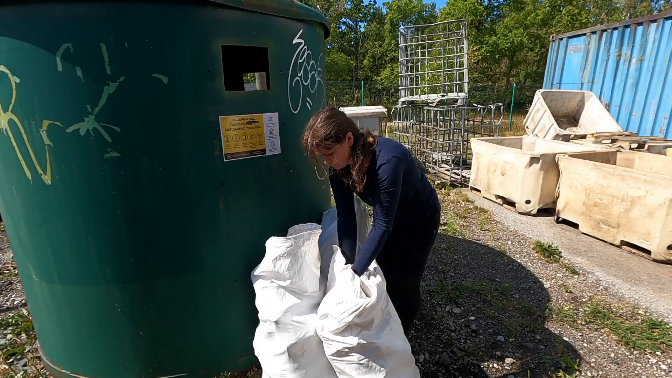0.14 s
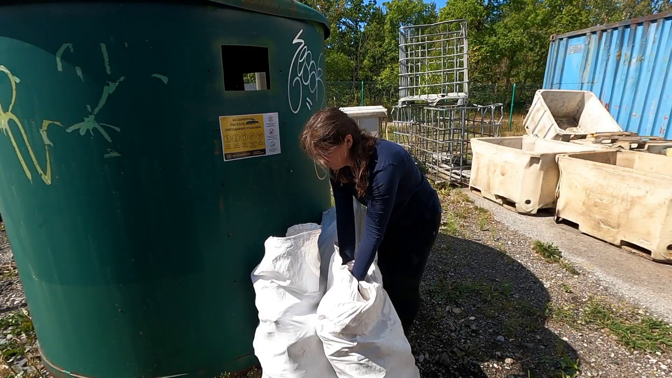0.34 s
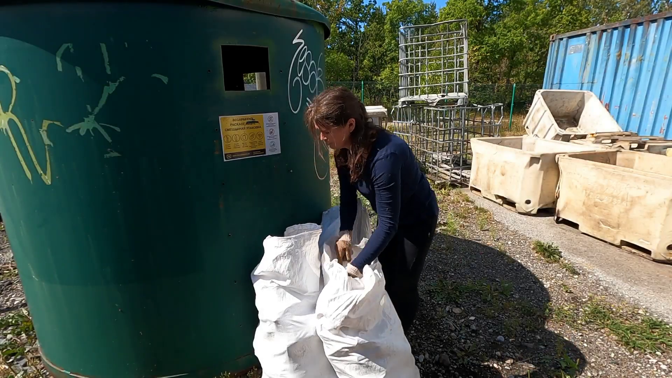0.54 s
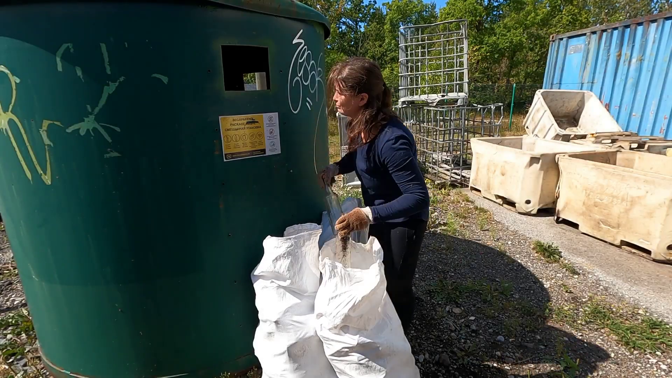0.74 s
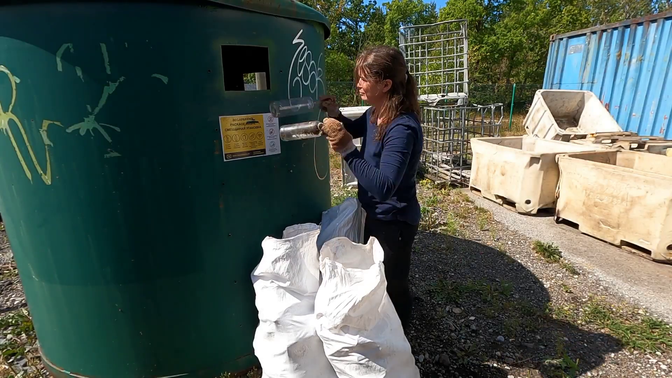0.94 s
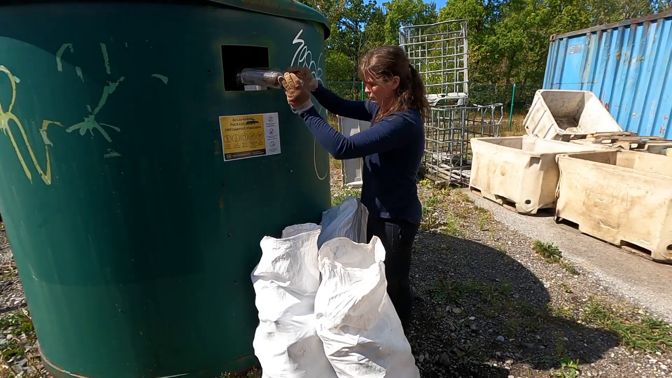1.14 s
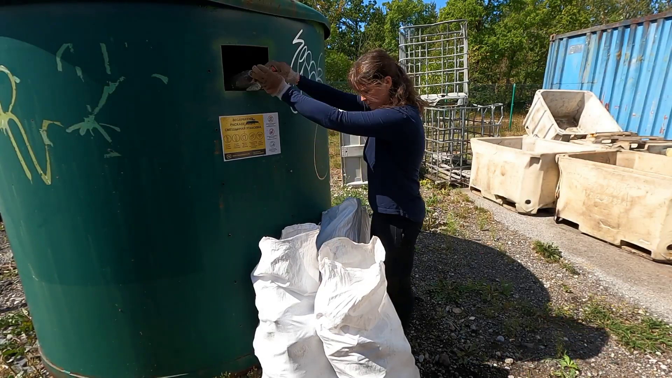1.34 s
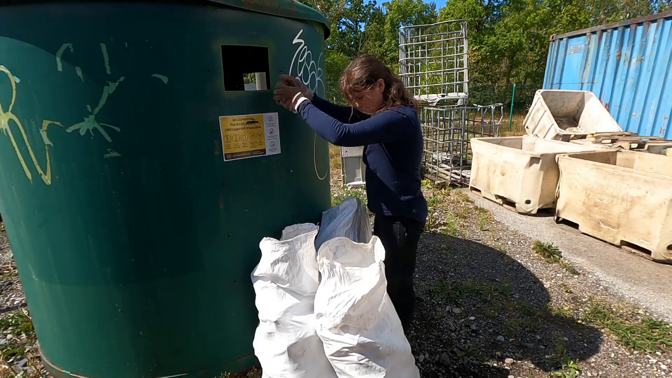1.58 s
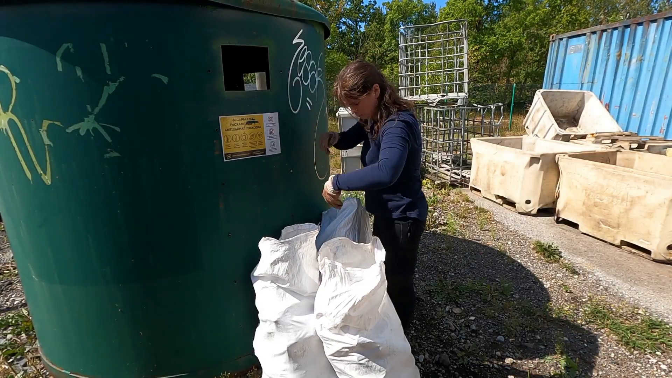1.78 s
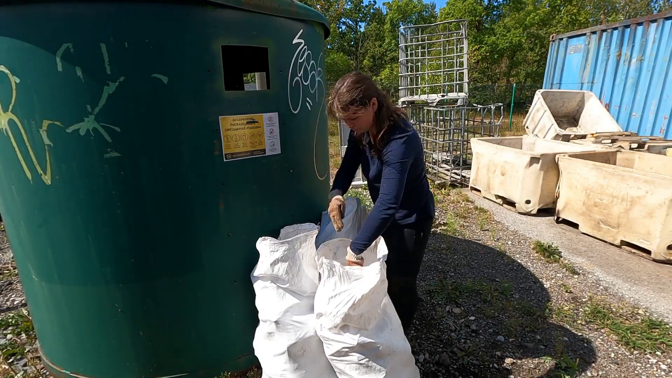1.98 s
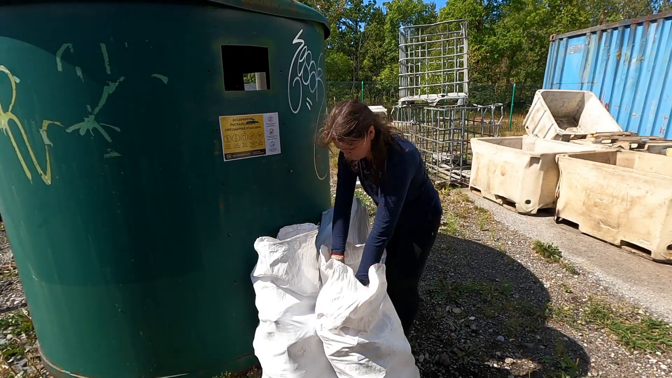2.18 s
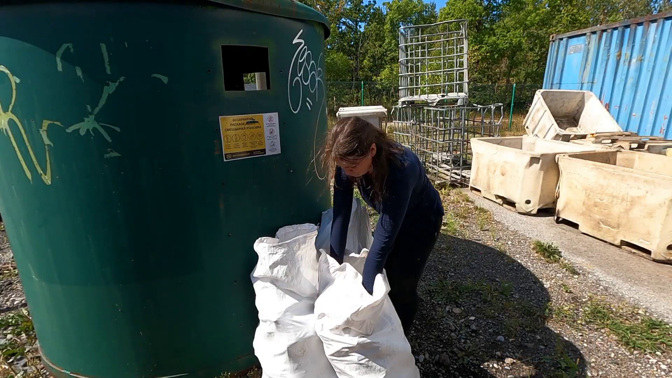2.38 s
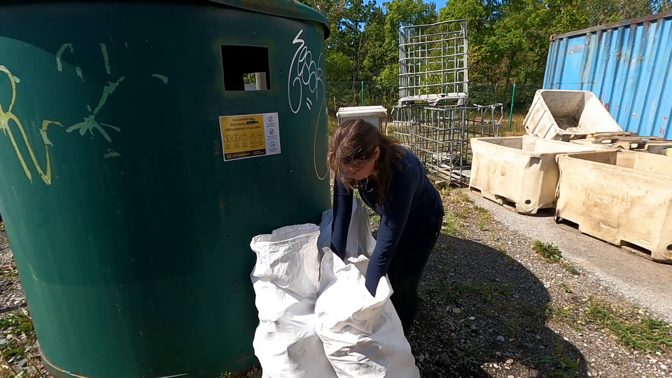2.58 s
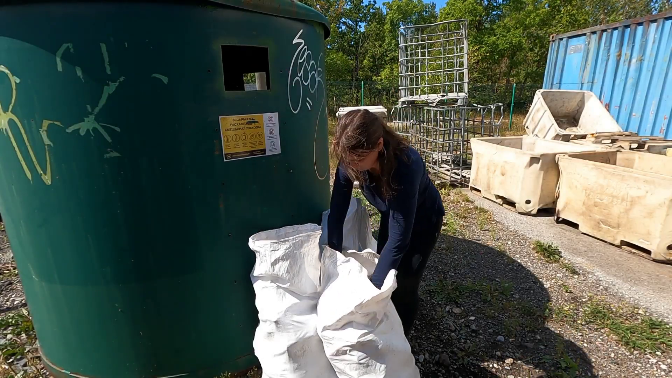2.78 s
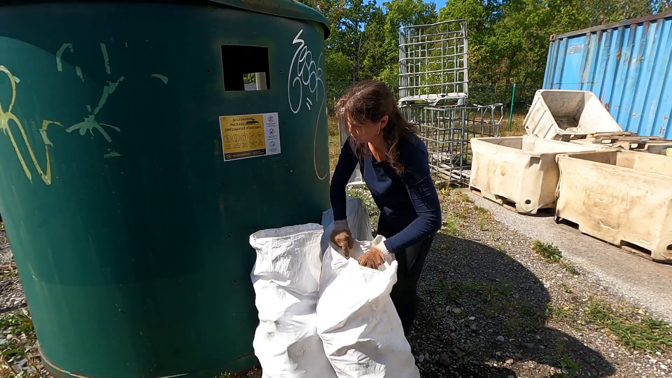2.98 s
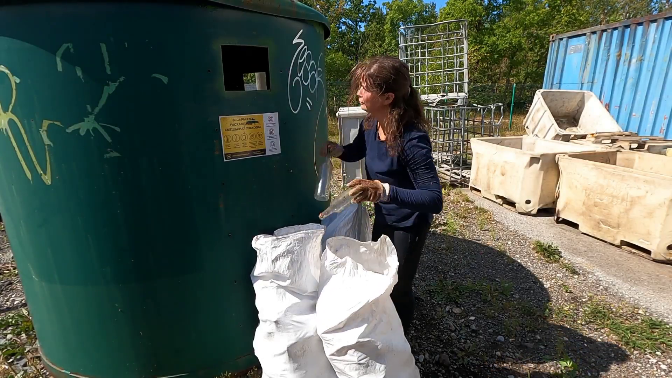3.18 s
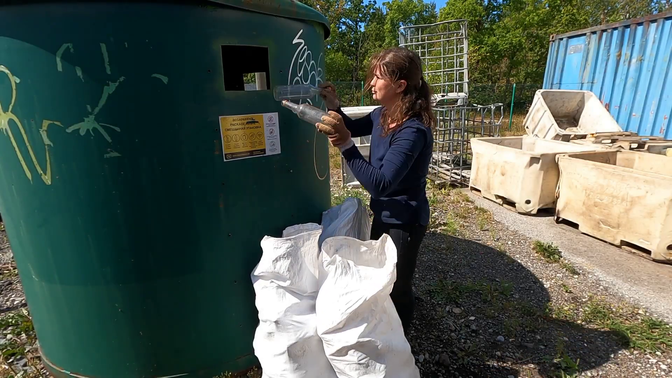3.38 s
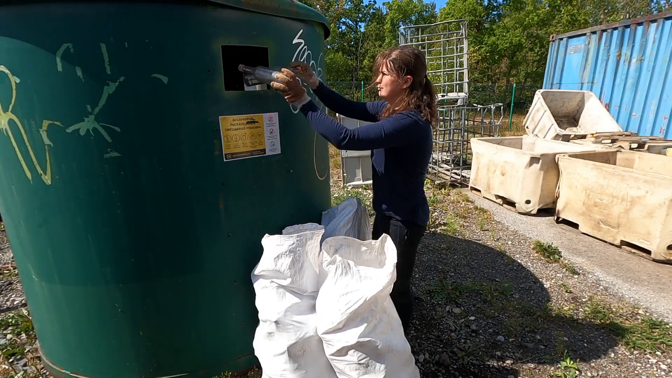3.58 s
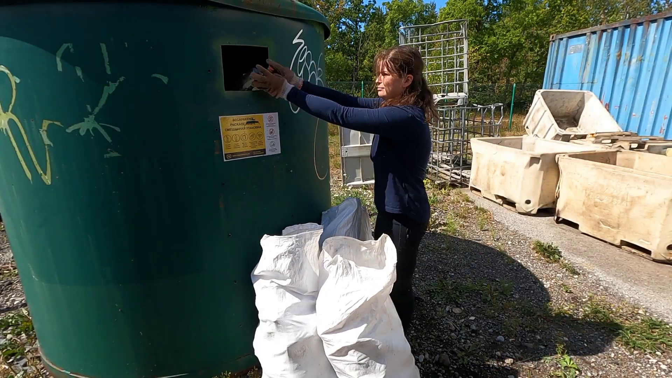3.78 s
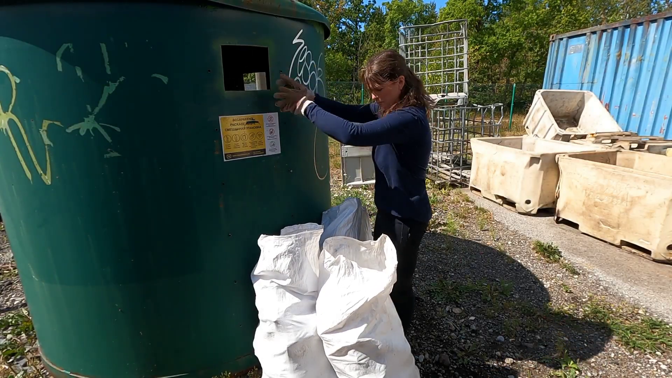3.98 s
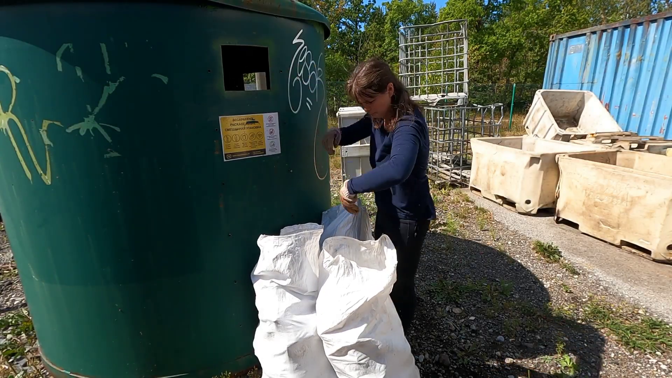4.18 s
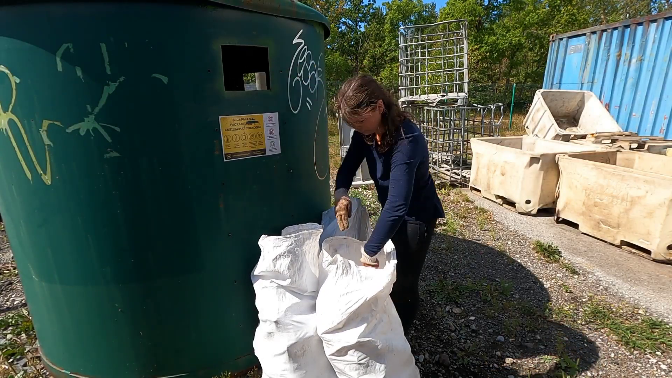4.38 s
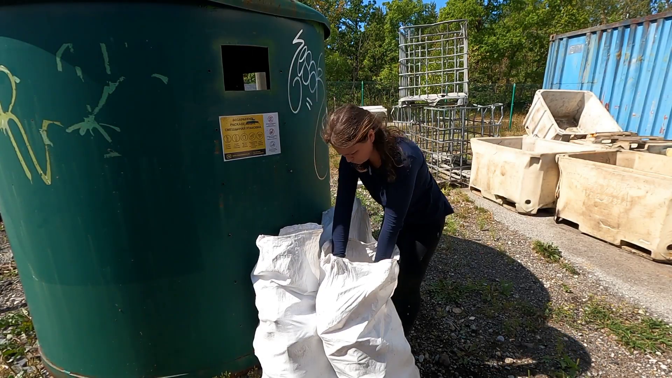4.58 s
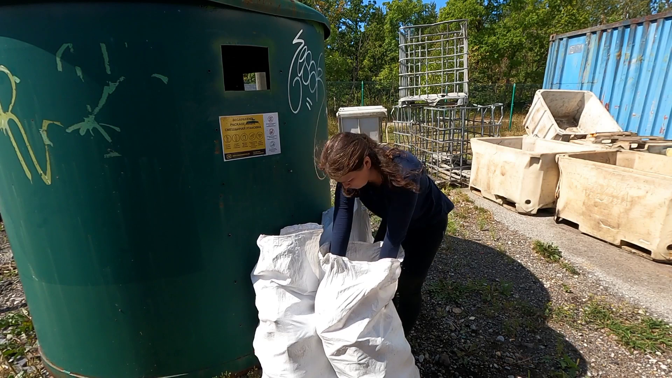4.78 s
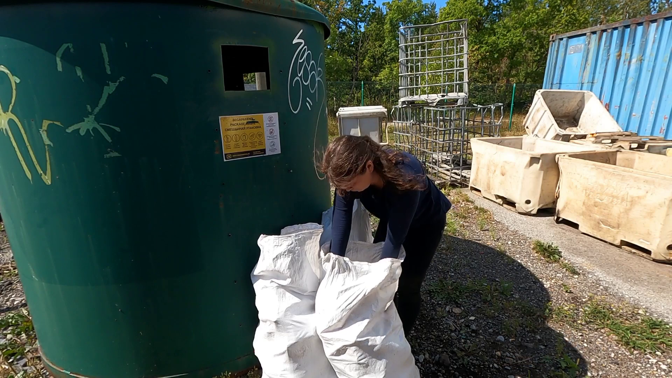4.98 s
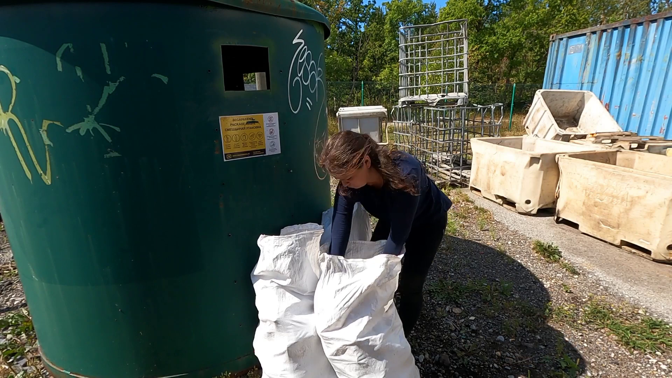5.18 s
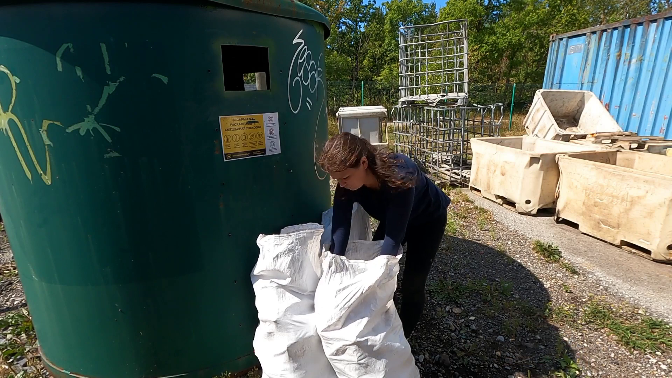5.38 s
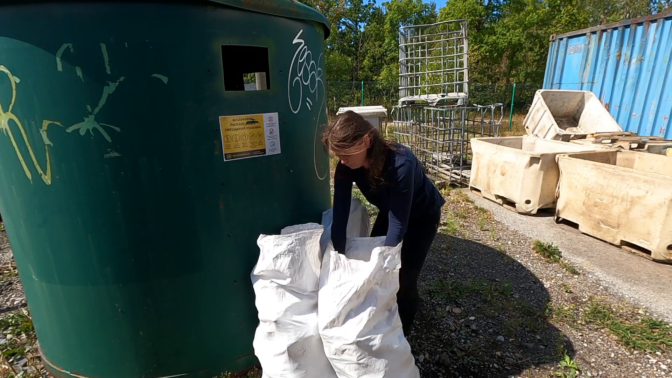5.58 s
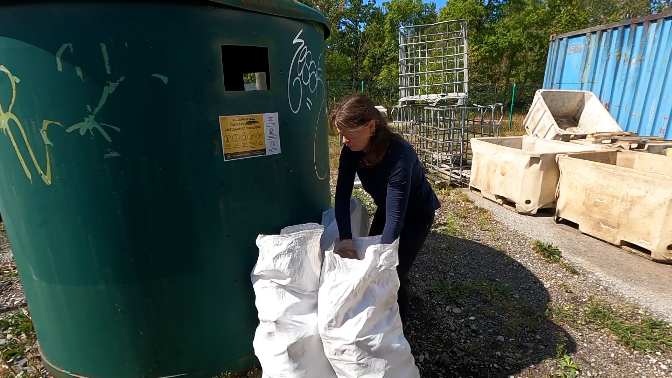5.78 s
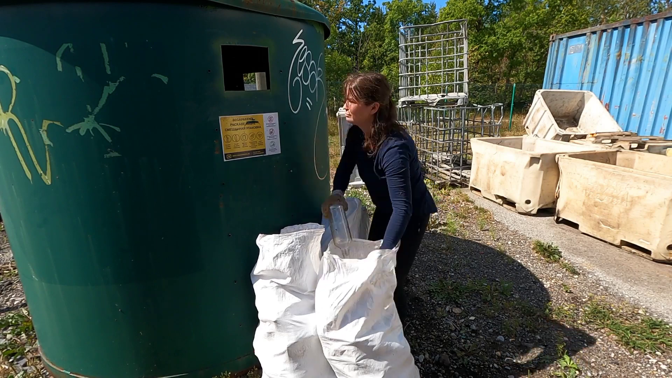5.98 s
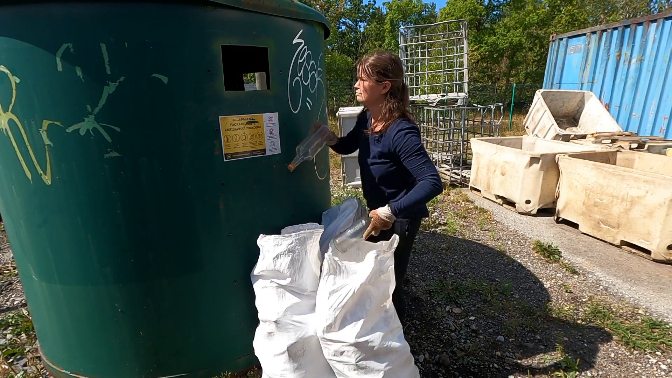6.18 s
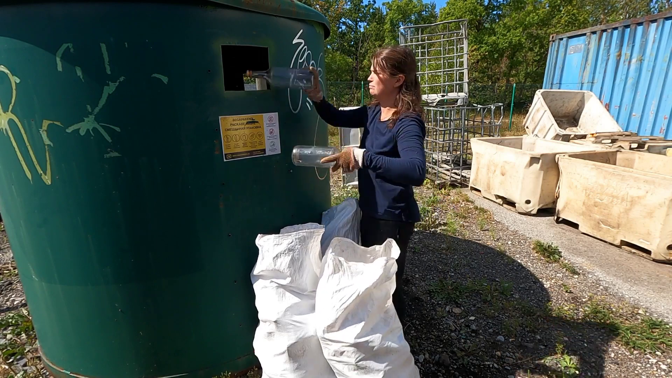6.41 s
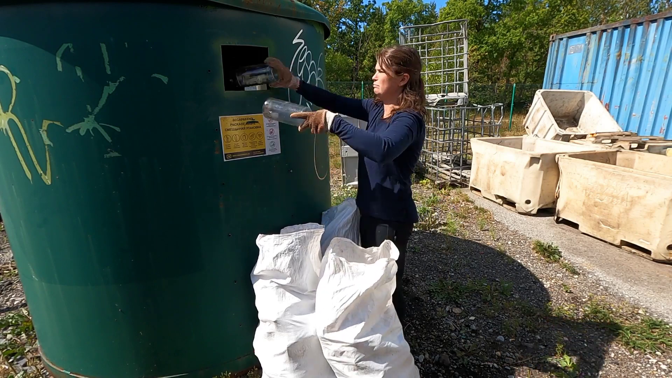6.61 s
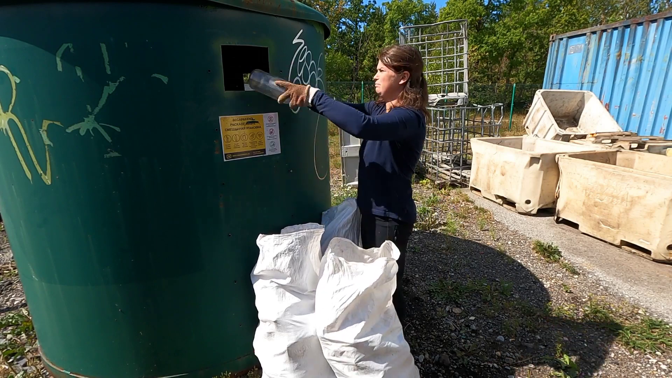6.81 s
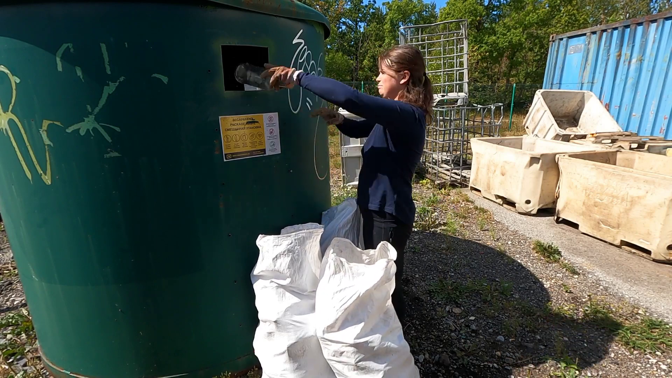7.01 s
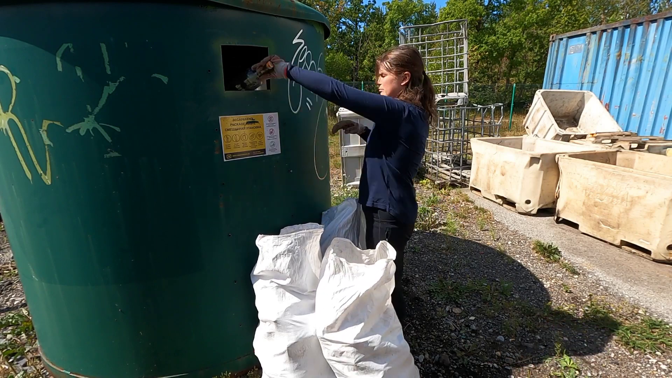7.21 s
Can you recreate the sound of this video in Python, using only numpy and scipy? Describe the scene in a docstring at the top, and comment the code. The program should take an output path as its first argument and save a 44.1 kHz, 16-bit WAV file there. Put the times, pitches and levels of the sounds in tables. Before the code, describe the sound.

Crinkly sack rustle and small dull clinks, a pause, hollow booming knocks at a bin opening, then a hard, bright smash inside with shards sliding and settling. The cycle repeats with a clear clink before another crash, then busier rummaging, and lastly a rim knock and ringing landing. Quiet open yard, light gusts on a nearby microphone, enclosed echo only on the glass in the bin.

```python
"""Glass bottles and jars, modelled as sums of decaying modes, clink in a sack and are pushed into a bottle bank.
They knock on the rim, where filtered noise and standing waves make the bin boom, then smash on the heap inside:
cracks, thuds and random streams of tinkling shards, sent through a tail of dense echoes.
The woven sack rustles as clumps of tiny snaps; gusts and the hush of the yard are shaped noise."""
import sys
import numpy as np
from scipy import signal
from scipy.io import wavfile
from scipy.ndimage import uniform_filter1d

SR = 44100
rng = np.random.default_rng(int(sys.argv[2]) if len(sys.argv) > 2 else 0)


def materialize(psi):
    """Save the field psi as 16-bit PCM at rate SR to the path in sys.argv[1].

    A 1-D psi becomes a single channel; in a 2-D psi each row is a channel.
    """
    bounded = np.clip(np.atleast_2d(psi).T, -1, 1)
    quanta = np.round(bounded * 32767).astype(np.int16)
    wavfile.write(sys.argv[1], SR, quanta)


N = 319725

# Levels hold within a part or in the mix, ahead of the offsets in its function, the yard and the microphone.
# modes of each piece of glass, by name: mode_hz, level_db, t60_s
GLASS_MODES = { "jar": [(2271, 6, 0.16), (2570, 3.5, 0.12), (3880, 4, 0.14), (5420, 3, 0.14),
               (5730, 0.5, 0.12), (7550, -2.5, 0.14), (8400, -0.5, 0.063)], "flask": [(2574, 8.5, 0.21),
               (3230, 8, 0.071), (4810, 2.5, 0.091), (4791, -6, 0.29), (5950, -1, 0.036), (6380, -7, 0.18),
               (7320, 0.5, 0.077), (8340, -11, 0.11)], "wine": [(2540, -16, 1.8), (2593, -9.5, 0.78),
               (3380, 8.5, 0.059), (3535, -0.5, 0.27), (3634, 3.5, 0.21), (4990, -26, 0.14),
               (6400, -7, 0.052), (7270, -9, 0.16), (11700, -15, 0.066)], "stout": [(2583, 0, 0.55),
               (3300, 0, 0.064), (3460, 10.5, 0.25), (6100, -2.5, 0.34)], "beer": [(2583, 1.5, 0.4),
               (3354, 6.5, 0.059), (3534, 0.5, 0.26), (4900, 0.5, 0.26), (6200, 0.5, 0.15),
               (7350, -15, 0.22), (9500, -13.5, 0.1)], "tall": [(2380, 0, 0.25), (4010, -5, 0.2),
               (5500, -3, 0.16), (6030, -5.5, 0.39), (6920, -15, 0.29), (8520, -16, 0.31)],
               "slim": [(2480, -9, 0.49), (4080, 3.5, 0.11), (5420, -9, 0.13), (6350, -3.5, 0.45),
               (9040, -14, 0.52)], "squat": [(2540, -12.5, 0.27), (3406, 2.5, 0.36), (4086, -0.5, 0.32),
               (4860, -11, 0.23), (6200, -15, 0.22), (7040, -11, .12), (7450, -13, 0.21)],
               "round": [(2536, 5, 0.34), (3330, 0.5, 0.22), (4260, 2.5, 0.29), (4890, 4, 0.11),
               (6380, -0.5, 0.3), (7300, -2.5, 0.16)], "small": [(2400, 3, 0.46), (2810, 9, 0.26),
               (4220, 8.5, 0.27), (4880, 9.5, 0.3), (5350, 7, 0.3), (6185, 5, 0.38), (7150, 2, 0.3),
               (8910, -1.5, 0.27)], "heavy": [(2402, -12, 0.56), (4010, 8, 0.17), (4090, 4, 0.21),
               (5900, 1, 0.19), (7040, -4, 0.22), (8700, -19, 0.28)], "tiny": [(3284, -5, 0.064),
               (5350, -2, 0.092), (5740, 2, 0.16)], "wide": [(2586, 5.5, 0.11), (2437, 2.5, 0.087),
               (4950, -1, 0.08), (6100, 1, 0.12), (7800, -16, 0.2)], "slab": [(1399, -1.5, 0.17),
               (2560, -0.5, 0.57), (3100, 1, 0.27), (4140, -3, 0.2), (4840, 4, 0.14), (5300, 0, 0.27),
               (5860, -4, 0.18)], "neck": [(2960, -10, 0.64), (3310, 4, 0.19), (4410, -3, 0.43),
               (6010, -7.5, 0.25), (6600, -15, 0.25)], "base": [(2250, -13, 0.14), (4030, 6.5, 0.14),
               (5780, -2.5, 0.24), (6907, -11, 0.26), (7200, -8.5, 0.75), (9700, -9, 0.22)],
               "bottom": [(2574, 0, 0.45), (6325, -2, 0.26)], "shard": [(1650, -8, 0.25), (3110, 7, 0.23),
               (3430, -7, 0.42), (4140, -6, 0.35), (5270, -6, 0.24), (6380, -7, 0.3)]}
# glass against glass in the sack or hands; the long ring at 5.127 s is probably a landing in the bin:
# start_s, glass, ring_db, knock_db, tilt_db_per_octave, grip (share of ring time left)
CLINKS = [ (0.149, "small", -30, -25, -4, 0.27), (.169, "small", -24, -37, 4, 0.16),
          (0.187, "base", -35, -43, 0, 0.3), (0.47, "small", -29.5, -35.5, 5, 0.63),
          (0.508, "stout", -39, -29.5, -16, 0.38), (.537, "tiny", -25.5, -27, -5, 0.31),
          (.558, "stout", -31.5, -28.5, -3, 0.27), (0.942, "round", -38.5, -59, 2.5, 0.22),
          (2.816, "squat", -36, -30.5, 0, 0.27), (2.865, "heavy", -33, -29, -10, 0.18),
          (2.877, "squat", -28, -28, -6, 0.16), (2.883, "heavy", -36, -25.5, -6, 0.14),
          (2.896, "wine", -22.5, -23.5, -9, 0.14), (2.904, "stout", -25.5, -31, -4, 0.38),
          (3.015, "stout", -23, -32, -1, 0.62), (3.1765, "wine", -12.5, -23.5, -3, 0.87),
          (4.707, "round", -34, -33, -1, 0.36), (5.127, "slim", -21.5, -37.5, -3, 1),
          (5.147, "slim", -31, -34, 8, 0.64), (5.217, "squat", -53, -39, 0, 0.29),
          (5.239, "squat", -50, -24.5, 4, 0.2), (5.256, "slim", -37, -46, 0, 0.69),
          (5.347, "wine", -38.5, -45, -1, 0.34), (5.46, "round", -32, -23, 5, 0.53),
          (5.513, "small", -23.5, -28, 0.5, 0.16), (5.55, "slim", -31.5, -38, -4, 0.35),
          (5.769, "squat", -40, -38, 1, 0.66), (5.779, "heavy", -25.5, -30, -14.5, 0.37),
          (5.86, "squat", -39, -40, -8, 0.49), (5.972, "squat", -19, -17.5, -1.5, 0.59),
          (6.061, "round", -20.5, -22, 1, 0.2), (6.076, "round", -25, -30.5, -2.5, 0.52),
          (6.113, "round", -28.5, -49, 6.5, 0.53), (6.162, "round", -36.5, -60, 6, 0.35),
          (6.255, "round", -43.5, -42, 4.5, 0.26)]
# glass against the rim of the opening: start_s, glass, ring_db, boom_db, tilt_db_per_octave, grip (as above)
RIM_KNOCKS = [ (1.321, "jar", -31.5, -20.5, -7.5, 1), (1.434, "jar", -23, -19.5, 2, 0.53),
              (1.497, "flask", -18.5, -23, 3.5, 0.99), (3.735, "beer", -34.5, -25.5, -1, 0.57),
              (3.767, "beer", -20, -21, 4.5, 0.58), (3.823, "beer", -18, -30.5, -6.5, 0.62),
              (6.782, "tall", -18, -20, -3.5, 0.57)]
# glass landing on the heap: start_s, glass, ring_db, tilt_db_per_octave, crack_db, thud_db, thud_hz
LANDINGS = [ (1.852, "jar", -33, 2, -29, -19, 400), (1.864, "jar", -18.5, -2, -19, -23, 141),
            (1.873, "beer", -25.5, -19, -23, -26, 170), (1.935, "jar", -23, 0, -37, -28.5, 497),
            (1.994, "wide", -19, -1, -27, -35, 400), (2.017, "tall", -25, 1, -33, -50, 400),
            (2.144, "flask", -25, 0.5, -29.5, -43, 387), (2.226, "jar", -25, 2, -26.5, -35, 650),
            (2.262, "wide", -26.5, -12, -25.5, -24.5, 860), (2.292, "flask", -25.5, -10, -42, -30, 170),
            (2.318, "neck", -29, -22, -40, -27.5, 1000), (2.534, "neck", -27.5, 6, -43, -38, 410),
            (2.709, "neck", -36, -12, -40, -35.5, 420), (4.207, "beer", -47, 5, -20.5, -24.5, 1050),
            (4.223, "beer", -21, 5, -17, -30.5, 254), (4.304, "slab", -25, -7.5, -48, -55, 400),
            (4.359, "flask", -26, 7, -35, -30.5, 285), (4.397, "slab", -24.5, 5, -38, -38, 400),
            (4.441, "slab", -29.5, -3, -30, -48, 400), (4.487, "base", -24, -4, -34, -52, 408),
            (4.81, "shard", -28.5, -2, -52, -68, 402), (4.865, "shard", -41, 3, -49, -66, 400),
            (4.975, "bottom", -37.5, 0, -48, -44.5, 400), (7.13, "wide", -20, -4, -26, -32.5, 1260),
            (7.138, "wide", -22.5, 5, -21, -23.5, 126), (7.150, "heavy", -14, -0.5, -37, -51, 163),
            (7.171, "heavy", -23, 10, -39, -48, 141), (7.221, "heavy", -24.5, 0, -44, -51, 147)]
# the first hard stop of a falling bottle: centre_s, level_db, pitch_hz
BLOWS = [(1.8513, 3.5, 867), (4.2095, -4, 1500), (4.2215, -24, 1200)]
# parts of the heap giving way: start_s, clatter_db, splinters_db, rumble_db, settling_t60_s
SLIDES = [ (1.861, -24, -33.5, -23, 0.91), (1.995, -31.5, -26.5, -50, 0.57), (2.228, -32, -35.5, -29.5, 3),
          (2.27, -46, -52, -26.5, 1.2), (2.518, -42, -28.5, -34.5, 0.46), (2.717, -34.5, -39, -35, 0.92),
          (4.219, -31, -24, -38, 2.4), (4.36, -60, -59, -36, 3.3), (4.58, -41, -27, -58, 0.44)]
# gusts on the microphone: peak_s, level_db, half_length_s
GUSTS = [(0.93, -26.5, 0.029), (1.115, -27, 0.071), (1.348, -21, 0.023), (1.768, -37.5, 0.12),
         (2.407, -28.5, 0.045), (2.752, -42, 0.084), (3.263, -33, 0.083), (3.743, -41.5, 0.048),
         (5.136, -33.5, 0.06), (6.398, -33.5, 0.033), (6.552, -41.5, 0.052), (6.803, -30, 0.034),
         (7.137, -26.5, 0.073)]
# spectra of the sources, before scaling to rms 1: frequency_hz, density_db
KNOCK_SPECTRUM = [(100, -50), (400, 0.5), (800, 4), (1200, 7), (1700, 5), (2500, -13.5), (3800, -2.5),
                  (5500, -74), (9000, -42), (15000, -26)]
BOOM_SPECTRUM = [(60, -18), (150, -7.5), (280, -4.5), (420, -1), (850, 0.5), (1150, -2.5), (1500, -10),
                 (2000, -22), (4000, -17.5), (8000, -81), (14000, -46)]
CRACK_SPECTRUM = [(60, 2.5), (170, 8), (450, -21.5), (1000, -7), (1700, -9), (2500, -3), (5500, -1.5),
                  (8500, -11.5), (14000, -31.5)]
RUMBLE_SPECTRUM = [(50, -16), (130, 4.5), (270, -8), (420, 4), (900, -1), (1400, -5.5), (1900, -9),
                   (3000, -31.5)]
SACK_SPECTRUM = [(60, -0.5), (110, 6.5), (160, 10.5), (400, 5), (1000, 6), (2000, -4), (4000, 2),
                 (7000, -5), (10000, -14), (13000, -15.5), (16000, -74)]
WIND_SPECTRUM = [(10, -4.5), (28, -0.5), (50, -5), (90, -11.5), (170, -19.5), (300, -37), (800, -70),
                 (3000, -86)]
YARD_SPECTRUM = [(35, -27), (60, -31), (160, -10), (295, -5.5), (762, -20.5), (1080, -11.5), (2110, -21.5),
                 (3500, -24), (10400, -66), (11900, -55), (15000, -74)]
# reverberation inside the bin: frequency_hz, t60_s
BIN_T60 = [(100, 2.95), (260, 0.71), (700, 0.88), (1840, 0.5), (4850, 0.35), (12000, 0.23)]
# standing waves of the bin: mode_hz, level_db, t60_s
BIN_MODES = [(136.6, -4.5, 1.15), (402.6, 4.5, 0.96), (533, -4, 1.1), (647, -1.5, 0.58), (714, -2, 0.65),
             (818, 4, 0.96), (900, 5, 0.54)]
# response of the microphone: frequency_hz, gain_db
MICROPHONE = [(1000, -2), (12500, -2.5), (14000, -9), (15000, -16), (16000, -26)]
# spells of rustle: hands working at the sack, lastly only sleeves: start_s, end_s, rustle_db
RUSTLE_SPELLS = [(0, 0.602, -42), (2.323, 3.01, -42), (4.57, 6.145, -40), (6.375, 6.53, -51.5)]
# short swells of rustle: the sack crumples as a piece is pulled loose, or a shoe scuffs: peak_s, level_db
RUSTLE_SWELLS = [(0.03, -39), (0.36, -39.5), (2.973, -31), (4.105, -52.5), (4.65, -35), (5.23, -33),
                 (5.568, -33.5), (5.682, -35.5), (7.05, -49.5)]
# a bottle dragged across its neighbour in the sack: start_s, length_s, level_db
SCRAPES = [(2.868, 0.024, -26)]
# what the scrape rings with: mode_hz, level_db, t60_s
SCRAPE_MODES = [(3660, -2, 0.04), (4100, 3, 0.028), (4680, 0, 0.027), (5030, -8, 0.03)]
# the filled sack thumps as its load shifts: start_s, level_db
THUMPS = [(5.969, -38), (6.06, -35)]
# glass rolling on after it lands: start_s, glass, level_db, bumps_t60_s
TUMBLES = [(1.88, "jar", -23, 1.3), (1.88, "flask", -23, 0.77), (2.24, "jar", -28, 1.7),
           (2.3, "flask", -36, 1.5), (4.23, "beer", -26, 2.4), (4.301, "bottom", -45, 1.2),
           (4.5, "base", -27.5, 0.8), (2.32, "neck", -30.5, 1.3), (4.26, "slab", -23.5, 1.6),
           (4.81, "shard", -36, 0.47)]

EDGE_HZ = 15800  # upper band limit
SLIDE_RISE_S, RUMBLE_T60_S = 0.018, 1.72
SPLINTER_SETTLING = 0.79  # share of the settling time: fine splinters come to rest sooner
SPELL_RISE_DB_PER_S, SPELL_FALL_DB_PER_S = 78, 66
SLEEVES_DB, BREEZE_DB = -60, -57
SWELL_HALF_S = 0.03
TIME = np.arange(N) / SR
SECOND = TIME[:SR]


def amp(db):
    """A level in decibels is twenty times the logarithm of an amplitude."""
    return 10 ** (np.asarray(db) / 20)


def unit(x, size=None):
    """Mean power sets loudness: scales to rms 1, taken over the first samples if a size is given."""
    return x / np.sqrt(np.mean(x[:size] ** 2) + 1e-20)


def read(points, hz):
    """Pitch is heard in ratios: a curve is interpolated along logarithmic frequency."""
    f, value = np.transpose(points)
    return np.interp(np.log(hz + 1), np.log(f + 1), value)


def add(mix, s, sound):
    """Superposition: pressures add, here from time s on."""
    part = mix[round(s * SR):][:len(sound)]
    part += sound[:len(part)]


def colour(x, spectrum):
    """Minimum phase: a causal filter with the given spectrum keeps attacks sharp."""
    log_gain = np.log(amp(read(spectrum, abs(np.fft.fftfreq(4096, 1 / SR)))))
    taps = np.fft.ifft(np.exp(np.conj(signal.hilbert(log_gain)))).real
    return signal.oaconvolve(x, taps[:len(taps) // 2])[:len(x)]


def decay(t, t60):
    """Exponential decay: the amplitude falls by 60 dB in the time t60."""
    return np.exp(-np.log(1000) * t / t60)


def clumps(depth_db, span_s):
    """Intermittency: a random gain that comes in bursts."""
    return amp(depth_db * unit(uniform_filter1d(rng.standard_normal(N), max(int(span_s * SR), 1))))


def swell(s, half_s):
    """A hyperbolic secant rises smoothly to 1 at time s and dies away again."""
    return 1 / np.cosh(np.clip((TIME - s) / half_s, -50, 50))


def together(gains):
    """Incoherent addition: the powers of unrelated sounds add."""
    return np.sqrt(sum(gain ** 2 for gain in gains))


def contact(decay_s, scatter):
    """Impact: one sharp contact followed by a short random chatter."""
    t = SECOND[:SR // 4]
    blow = scatter * rng.standard_normal(len(t)) * np.exp(-t / decay_s)
    blow[0] += 1
    return blow


def ring(modes, tilt_db=0, grip=1, split_hz=26, twin=0.58):
    """Mode splitting: a body never quite round gives each mode a weaker twin that beats with it."""
    out = np.zeros(SR)
    for hz, db, t60 in modes:
        phase, detune, side = rng.random(3)
        held_t60 = t60 * grip
        t = SECOND[:int(held_t60 * SR) + 1]
        twin_hz = hz + split_hz * (.5 + detune) * np.sign(side - .5)
        pair = np.sin(2 * np.pi * (hz * t + phase))
        pair += twin * np.sin(2 * np.pi * (twin_hz * t + 2 * side))
        add(out, 0, pair * amp(db + tilt_db * np.log2(hz)) * decay(t, held_t60))
    onset = 1 - np.exp(-SECOND / 0.0005)
    return unit(out * onset, size=441)


def glass_on_glass(glass, tilt_db, grip, other_db=-6, other_t60=0.1, low_hz=2300, high_hz=9500, count=16):
    """Shared excitation: the named glass rings, and its packed neighbours ring briefly at many pitches."""
    hz = low_hz * (high_hz / low_hz) ** rng.random(count)
    others = ring([(f, 0, other_t60) for f in hz], tilt_db - 5.0)
    return unit(ring(GLASS_MODES[glass], tilt_db, grip) + amp(other_db) * others, size=441)


def struck(tone, extra=.8, drain_s=0.023):
    """Contact damping: touching pieces drain the ring quickly, after which it rings freely."""
    return unit(tone * (1 + extra * np.exp(-SECOND / drain_s)), size=441)


def chatter(x, bounce_s=.004, share=0.44, count=3):
    """Repeated impact: the glass skips a few times, ever more weakly."""
    out = x.copy()
    for k, s in enumerate(np.cumsum(bounce_s * (.3 + rng.random(count)))):
        add(out, s, x * share / (k + 1))
    return unit(out, size=441)


def tock(hz=1250, decay_s=0.0067, spread=0.32):
    """Impulsive acceleration: two heavy bodies stop each other and push a few quick cycles of air."""
    t = SECOND[:SR // 4]
    octaves = spread * (2 * rng.random() - 1)
    return unit(np.sin(2 * np.pi * hz * 2 ** octaves * t) * np.exp(-t / decay_s), size=441)


def bin_echo():
    """Reverberation: dense echoes inside the bin, of energy 1, with the treble dying first."""
    hz, t, z = signal.stft(rng.standard_normal(SR), SR, nperseg=256)
    fading = z * amp(-60 * t / read(BIN_T60, hz)[:, None])
    tail = signal.istft(fading, SR, nperseg=256)[1][:SR]
    return tail / np.linalg.norm(tail)


def inside(tone):
    """Convolution: a tone as the bin throws it back."""
    return unit(signal.fftconvolve(tone, bin_echo())[:len(tone)], size=4410)


def noise_pair(spectrum, apart):
    """Partial coherence: two channels of noise share a middle part and differ by a side part."""
    mid, side = (unit(colour(rng.standard_normal(N), spectrum)) for _ in range(2))
    return np.array([mid + apart * side, mid - apart * side])


def air(yard_db=-56, apart=0.3):
    """Turbulence: gusts buffet each microphone port a little differently, over the steady hush of the yard."""
    gusts = [amp(db) * swell(s, half_s) for s, db, half_s in GUSTS]
    wind = together([amp(BREEZE_DB), *gusts])
    return wind * noise_pair(WIND_SPECTRUM, apart) + amp(yard_db) * noise_pair(YARD_SPECTRUM, apart)


def rustle_level(uneven_db=3.0):
    """Rubbing work sets the level: sleeves all the time, longer spells of rustle, and short swells."""
    spells = []
    for start, end, db in RUSTLE_SPELLS:
        before = SPELL_RISE_DB_PER_S * np.maximum(start - TIME, 0)
        after = SPELL_FALL_DB_PER_S * np.maximum(TIME - end, 0)
        spells.append(amp(db - before - after))
    swells = [amp(db) * swell(s, SWELL_HALF_S) for s, db in RUSTLE_SWELLS]
    return together([amp(SLEEVES_DB), *spells, *swells]) * clumps(depth_db=uneven_db, span_s=0.093)


def snaps(per_s, spread_db, decay_s):
    """Shot noise: snaps of random size and sign at random instants."""
    sizes = amp(spread_db * np.minimum(rng.exponential(1, N), 3)) * rng.choice([-1, 1], N)
    hits = sizes * (rng.random(N) < per_s / SR)
    return unit(signal.oaconvolve(hits, contact(decay_s, scatter=0.39))[:N])


def rustle(snaps_per_s=700, rub=0.6):
    """Buckling: woven plastic crackles in clumps over a soft rubbing hiss; now and then a crease pops over."""
    creases = 0.55 * snaps(per_s=70, spread_db=3, decay_s=0.002)
    crinkle = snaps(snaps_per_s, spread_db=2.5, decay_s=0.0052) + creases
    crinkle += rub * rng.standard_normal(N)
    crinkle = clumps(depth_db=0.82, span_s=0.021) * crinkle
    return unit(colour(crinkle, SACK_SPECTRUM)) * rustle_level()


def jostling(per_s=14, loudest_db=-2, spread_db=10, count=12):
    """Weak random impacts: pieces deep in the sack touch faintly, their level following the rustle."""
    out, t = np.zeros(N), SECOND[:SR // 10]
    fade = 1 - t / t[-1]
    names = list(GLASS_MODES)[:count]
    touches = [glass_on_glass(name, tilt_db=4.0, grip=0.56)[:len(t)] * fade for name in names]
    for when, which, size in rng.random((int(per_s * N / SR), 3)):
        add(out, when * N / SR, amp(loudest_db - spread_db * size) * touches[int(which * count)])
    return out * rustle_level()


def gravel(per_s=9, faintest_db=-68, range_db=8):
    """Band-limited impact: now and then a grain of gravel ticks under a shoe."""
    out = np.zeros(N)
    for when, size, pitch in rng.random((int(per_s * N / SR), 3)):
        hz = 3000 * 2 ** pitch
        band = signal.butter(1, [hz * .75, hz * 1.3], "band", fs=SR)
        grain = signal.lfilter(*band, contact(decay_s=.003, scatter=1))
        add(out, when * N / SR, amp(faintest_db + range_db * size) * unit(grain, size=441))
    return out


def clinks(free_s=0.144, damped_db=-9, closing_s=0.017, tock_db=-4, rattle_db=-1):
    """Damped free vibration: a dull knock, a short rattle and a ring that soon drops in level."""
    out = np.zeros(N)
    damping = amp(damped_db * np.clip((SECOND - free_s) / closing_s, 0, 1))
    for s, glass, ring_db, knock_db, tilt_db, grip in CLINKS:
        in_spell = any(start < s < end for start, end, _ in RUSTLE_SPELLS)
        if in_spell:  # other glass rings along
            tone = glass_on_glass(glass, tilt_db, grip)
        else:  # held in the air, a glass has no neighbours
            tone = ring(GLASS_MODES[glass], tilt_db, grip)
        tone = chatter(struck(tone, extra=0.68, drain_s=0.0017), bounce_s=0.005, share=0.35)
        add(out, s, amp(ring_db) * damping * tone)
        add(out, s, amp(knock_db + tock_db) * tock())
        rattle = contact(decay_s=.004, scatter=.3) + contact(decay_s=.025, scatter=.08)
        add(out, s, amp(knock_db + rattle_db) * unit(colour(rattle, KNOCK_SPECTRUM), size=441))
    return out


def rim_knocks(echo_db=-15, standing_db=-7):
    """Cavity resonance: glass rings in the opening while the wall and the air of the bin boom."""
    out = np.zeros(N)
    onset = 1 - np.exp(-SECOND / 0.00073)
    for s, glass, ring_db, boom_db, tilt_db, grip in RIM_KNOCKS:
        tone = ring(GLASS_MODES[glass], tilt_db, grip)
        tone = chatter(struck(tone, extra=0.79, drain_s=0.016), share=0.3)
        add(out, s, amp(ring_db) * (tone + amp(echo_db) * inside(tone)))
        crack = colour(contact(decay_s=0.028, scatter=0.089), CRACK_SPECTRUM)
        add(out, s, amp(ring_db - 9.0) * unit(crack, size=441))
        boom = unit(colour(bin_echo(), BOOM_SPECTRUM), size=2205)
        boom += amp(standing_db) * ring(BIN_MODES, split_hz=12.34)
        add(out, s, amp(boom_db) * boom * onset)
    return out


def blows():
    """Acceleration noise: the heap stops a bottle's base dead, one short push and pull of air."""
    out = np.zeros(N)
    for s, db, hz in BLOWS:
        u = 2 * np.pi * hz * (TIME - s)
        out += amp(db) * u * np.exp(-u ** 2 / 2)
    return out


def landings(echo_db=-9, tock_db=-5):
    """Impact and fracture: a bottle cracks on the heap, rings, and shakes the bin with a dull thud."""
    out = np.zeros(N)
    for s, glass, ring_db, tilt_db, crack_db, thud_db, thud_hz in LANDINGS:
        tone = chatter(glass_on_glass(glass, tilt_db, grip=0.81), share=0.21)
        add(out, s, amp(ring_db) * (tone + amp(echo_db) * inside(tone)))
        crack = colour(contact(decay_s=0.071, scatter=0.11), CRACK_SPECTRUM)
        add(out, s, amp(crack_db) * unit(crack, size=441))
        add(out, s, amp(crack_db + tock_db) * tock(hz=1164))
        dull = signal.butter(2, [thud_hz * 0.64, thud_hz * 1.69], "band", fs=SR)
        thud = signal.lfilter(*dull, bin_echo() * np.exp(-SECOND / 0.063))
        add(out, s, amp(thud_db) * unit(thud, size=1323))
    return out


def shards(low_hz, high_hz, per_s, t60, spread_db, direct, count=70):
    """Random superposition: splinters, each with its own three modes, are struck inside the bin."""
    t, out = SECOND[:SR // 5], np.zeros(N)
    hz = low_hz * (high_hz / low_hz) ** rng.random((count, 3, 1))
    life = t60 * np.exp(.5 * rng.standard_normal((count, 1, 1)))
    pieces = (np.sin(2 * np.pi * hz * t) * decay(t, life)).sum(1)
    for when, which, size in rng.random((int(per_s * N / SR), 3)):
        strength = amp(spread_db * min(-np.log(1 - size), 3))
        add(out, when * N / SR, strength * pieces[int(which * count)])
    return unit(direct * out + signal.oaconvolve(out, bin_echo())[:N])


def settle(s, db, t60):
    """Dissipation: a slide starts quickly and loses its energy at a steady rate."""
    age = np.maximum(TIME - s, 0)
    return amp(db) * np.minimum(age / SLIDE_RISE_S, 1) * decay(age, t60)


def slides(pieces_db=3.0):
    """Granular flow: large pieces ring, smaller ones clatter and fizz, and the bin rumbles under them."""
    pieces = shards(low_hz=2320, high_hz=7000, per_s=70, t60=.18, spread_db=4, direct=2)
    clatter = shards(low_hz=2189, high_hz=6850, per_s=150, t60=0.06, spread_db=4, direct=1.7)
    clatter = (clatter + amp(pieces_db) * pieces) * clumps(depth_db=1.6, span_s=0.03)
    splinters = shards(low_hz=6300, high_hz=14000, per_s=420, t60=.04, spread_db=3, direct=.9, count=140)
    fizz = [(3000, -55), (6400, -2.5), (7700, 6.0), (10000, -4.5), (12500, -5), (15000, -13)]
    splinters = unit(colour(splinters, fizz))
    rumble = rng.standard_normal(N) * clumps(depth_db=0.5, span_s=0.012)
    rumble = unit(colour(rumble, RUMBLE_SPECTRUM))
    clatter_gain = together(settle(s, db, t60) for s, db, _, _, t60 in SLIDES)
    splinter_gain = together(settle(s, db, t60 * SPLINTER_SETTLING) for s, _, db, _, t60 in SLIDES)
    rumble_gain = together(settle(s, db, RUMBLE_T60_S) for s, _, _, db, _ in SLIDES)
    return clatter * clatter_gain + splinters * splinter_gain + rumble * rumble_gain


def tumbles(per_s=34, echo_db=-6, spread_db=9):
    """Energy loss in rolling: a bottle runs on down the heap, and ever softer bumps ring it again."""
    out = np.zeros(N)
    for s, glass, db, t60 in TUMBLES:
        tones = []
        for _ in range(3):
            tone = glass_on_glass(glass, tilt_db=2, grip=0.9, other_db=-9)
            tone = struck(tone, extra=0.8, drain_s=0.004)
            tones.append(tone + amp(echo_db) * inside(tone))
        for k, (when, size) in enumerate(rng.random((int(per_s * t60 / 2), 2))):
            age = (k + when) / per_s
            add(out, s + age, amp(db - spread_db * size) * decay(age, t60) * tones[k % len(tones)])
    return out


def scrapes(slips_per_s=600, start_share=0.49):
    """Stick-slip friction: glass drags on glass, harder as it goes; each slip rings the same damped modes."""
    out, tone = np.zeros(N), ring(SCRAPE_MODES)
    for s, length, db in SCRAPES:
        strokes = np.zeros(SR)
        for along, size in rng.random((max(int(slips_per_s * length), 1), 2)):
            pressure = start_share + (1 - start_share) * along
            add(strokes, along * length, (.5 + size) * pressure * tone)
        add(out, s, amp(db) * unit(strokes, size=int(length * SR)))
    return out


def thumps(low_hz=210, high_hz=520):
    """Soft impact: the load drops a little and is stopped by the sack, a low band of noise."""
    out, soft = np.zeros(N), signal.butter(2, [low_hz, high_hz], "band", fs=SR)
    for s, db in THUMPS:
        thump = signal.lfilter(*soft, contact(decay_s=0.023, scatter=1))
        add(out, s, amp(db) * unit(thump, size=882))
    return out


def outdoors(x, width=0.45, left_db=0.5, scatter_s=0.0053, yard_db=-25, yard_t60=0.38, count=3):
    """Scattering: gravel and wall spread the treble by ever-changing paths; the yard returns a faint tail."""
    t, side = SECOND[:SR // 16], 0
    for k in range(count):
        taps = rng.standard_normal(len(t)) * np.exp(-t / scatter_s)
        share = np.cos(np.pi * (2 * TIME + k / count)) * np.sqrt(2 / count)
        side = side + signal.oaconvolve(x * share, taps / np.linalg.norm(taps))[:N]
    side = colour(side, [(250, -31), (600, -10.0), (1200, 1.5), (9000, -1.5)])
    tails = rng.standard_normal((2, SR)) * decay(SECOND, yard_t60)
    far = signal.oaconvolve(x[None], tails / np.linalg.norm(tails[0]), axes=1)[:, :N]
    near = np.array([x + width * side, x - width * side])
    balance = amp([[left_db / 2], [-left_db / 2]])
    return (near + amp(yard_db) * far) * balance


def scene():
    """Superposition: all sources but the air pass through the yard's scattering."""
    soft = rustle() + jostling() + gravel() + thumps()
    glass = clinks() + rim_knocks() + blows() + landings() + slides() + tumbles() + scrapes()
    return outdoors(soft + glass) + air()


def record(dry):
    """Saturation rounds off the loudest peaks; the top treble falls away, then the band limit follows."""
    heard = np.array([colour(np.tanh(x), MICROPHONE) for x in dry])
    band_limit = signal.firwin(511, EDGE_HZ, window=("kaiser", 9), fs=SR)
    return signal.oaconvolve(heard, band_limit[None], "same")


dry = scene()
out = record(dry)
materialize(out)
```